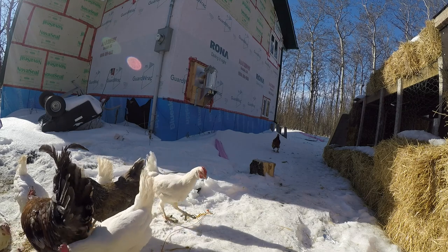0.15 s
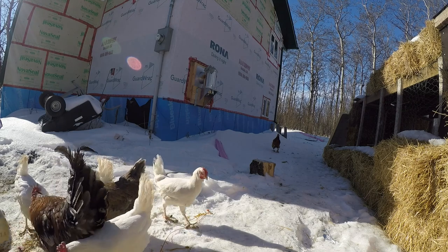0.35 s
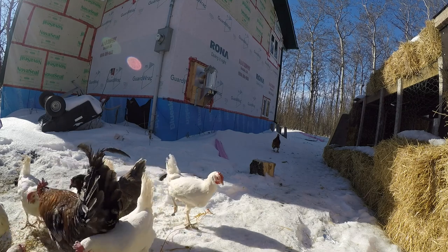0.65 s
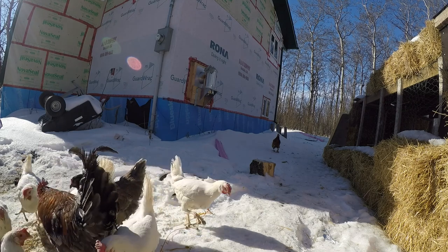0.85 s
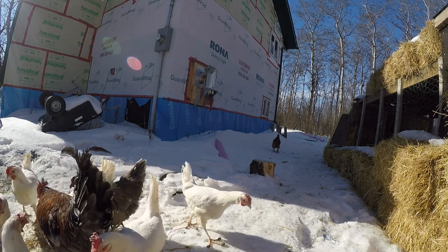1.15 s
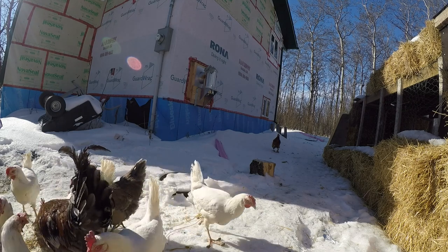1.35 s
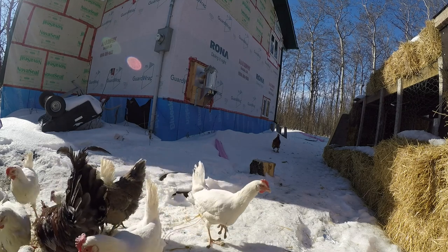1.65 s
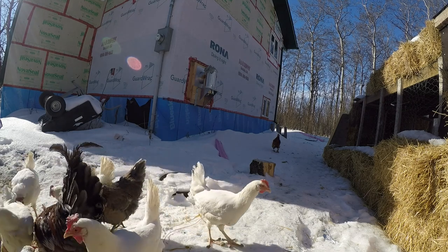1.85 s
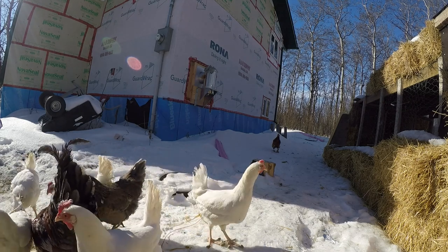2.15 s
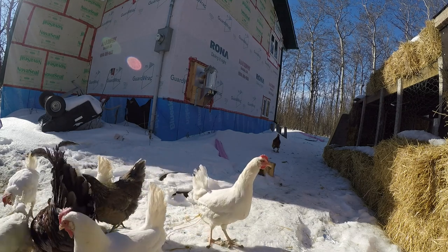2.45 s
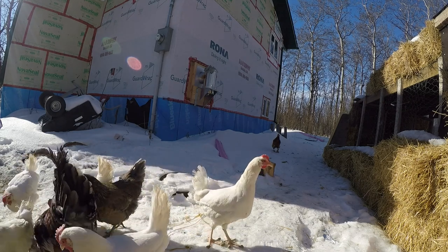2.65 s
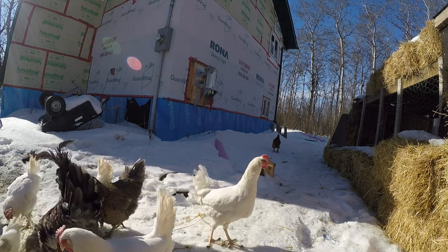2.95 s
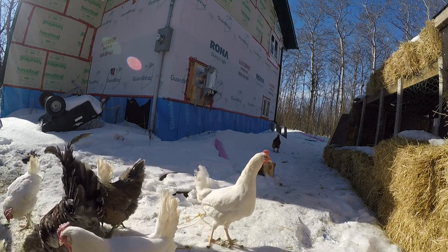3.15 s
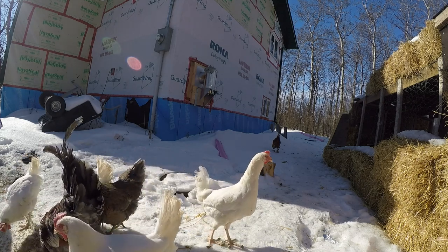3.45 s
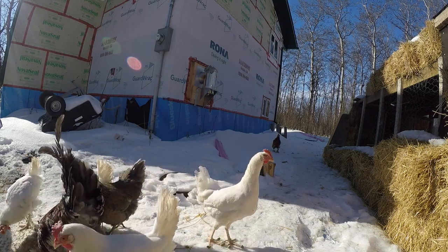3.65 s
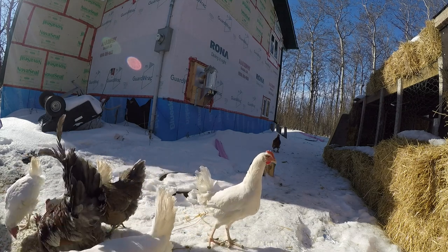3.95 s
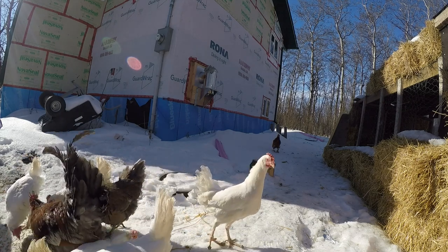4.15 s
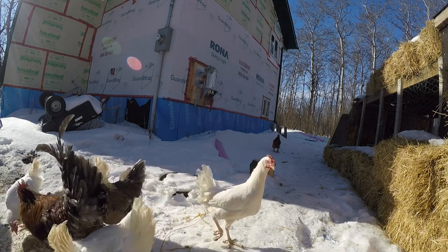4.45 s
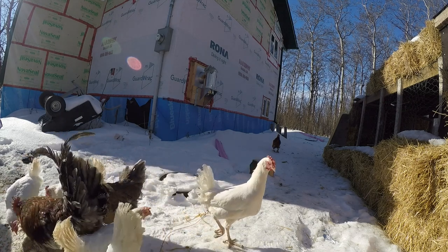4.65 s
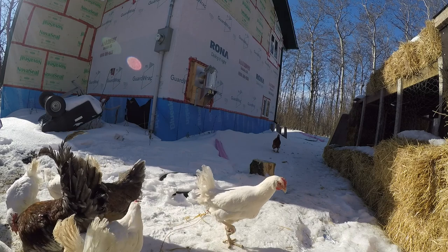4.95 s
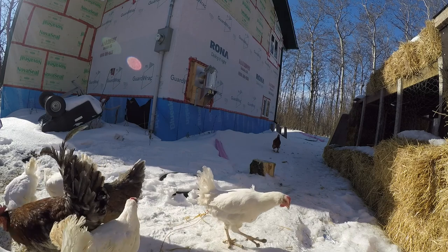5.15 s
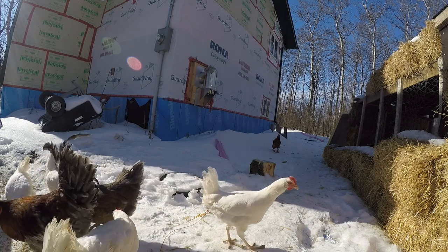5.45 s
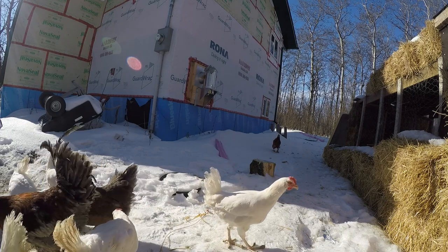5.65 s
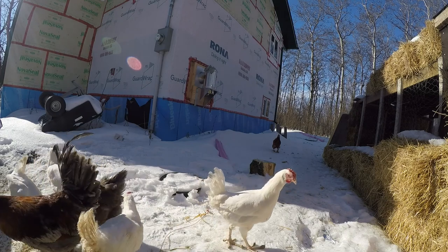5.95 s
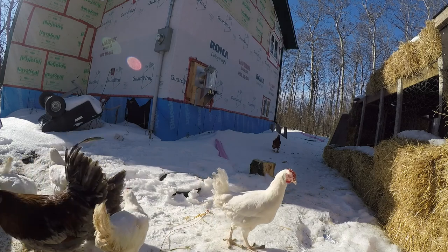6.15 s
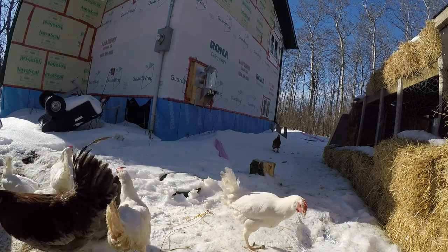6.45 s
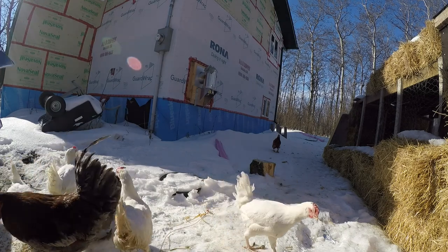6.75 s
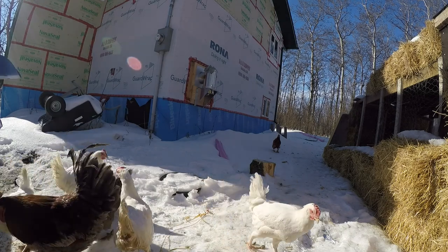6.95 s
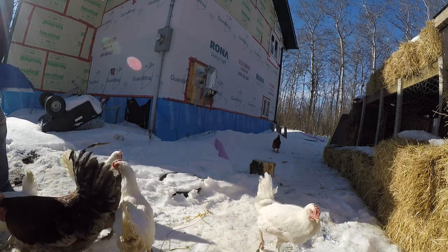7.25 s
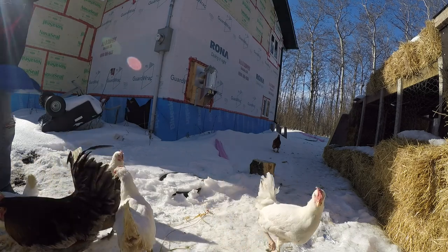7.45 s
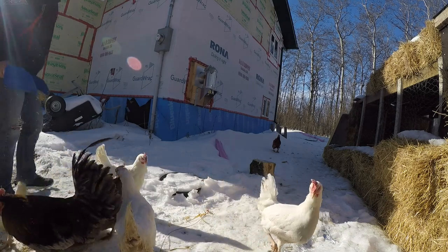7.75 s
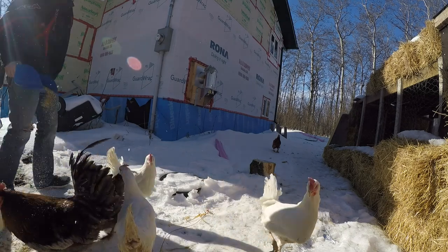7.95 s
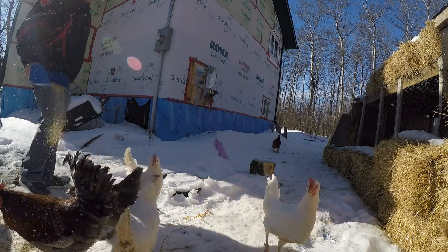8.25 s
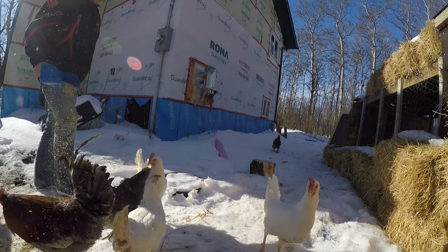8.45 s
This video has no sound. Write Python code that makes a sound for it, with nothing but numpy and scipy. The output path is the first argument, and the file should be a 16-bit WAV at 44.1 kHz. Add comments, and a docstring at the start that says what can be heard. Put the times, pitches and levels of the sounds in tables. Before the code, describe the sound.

Nearby chickens give short clucks and longer drawn-out calls while scratching softly in snow, as wind buffets the microphone.

```python
"""A snowy yard: hens cluck, peep, croon and scold close to a small camera in a housing.
Syrinx tones make the clear calls; membrane slaps ring windpipe and chest for the harsh ones.
Feet and beaks crunch the snow, ice crust snaps, wind buffets the microphone port.
A far engine hums and drops away near 5 s; the camera's electronics tick faintly, 30 times a second."""
import sys
import numpy as np
from scipy import signal
from scipy.fft import rfft, irfft, next_fast_len
from scipy.io import wavfile
from scipy.ndimage import map_coordinates

SR = 44100
rng = np.random.default_rng(int(sys.argv[2]) if len(sys.argv) > 2 else 0)


def inscribe(sig):
    """Save sig as 16-bit PCM at rate SR to the path in sys.argv[1].

    A 1-D sig is mono; a 2-D sig holds one channel per row.
    Samples are clipped to [-1, 1] before scaling.
    """
    pcm = np.round(np.clip(np.atleast_2d(sig).T, -1, 1) * 32767)
    wavfile.write(sys.argv[1], SR, pcm.astype(np.int16))


N = 379693

# distant air and traffic: f/Hz, relative density/dB
AIR_SPECTRUM = [(76, -26), (130, -7), (165, -10), (232, -11.5), (296, -12), (347, -12), (488, -18.5),
                (805, -10), (1620, -29.5), (3270, -26), (7740, -40), (8380, -33), (9080, -37), (14700, -41),
                (15600, -43.5)]
# engine hum: t/s, f/Hz, level/dB
ENGINE_TRACK = [(0, 116.8, -55), (2, 113.9, -54), (4.4, 114.5, -56), (4.9, 111.5, -58), (5.2, 109.3, -73),
                (8.61, 111.7, -65)]
# engine partials 1-3: gain/dB
ENGINE_PARTIALS_DB = [0.4, -13, -11]
# wind between gusts: t/s, level/dB
WIND_FLOOR = [(0, -46), (.9, -48), (3.3, -53), (5.1, -54), (6, -49), (6.8, -47.5), (7.15, -46), (7.8, -47),
              (8.1, -49), (8.61, -50)]
# gusts: t/s, level/dB, time to sink 10 dB/s
WIND_GUSTS = [(.55, -46, .2), (1.4, -46, .3), (4.1, -40.5, .12), (4.45, -40, .14), (5.6, -41.5, .3),
              (7.1, -43, .15), (7.45, -41, .1), (7.74, -40, .1), (7.94, -39.5, .08), (8.3, -43, .08)]
# buffeting at the port: f/Hz, relative density/dB
WIND_SPECTRUM = [(8.8, -29), (15, 0.5), (27, 0.5), (40, -0.5), (79, -11), (124, -25), (200, -31.5),
                 (260, -43), (440, -120)]
# drawn-out calls in the low register, one list each: t/s, f/Hz, level/dB
CROON_TRACKS = [
    [(0, 338.4, -43.5), (0.04, 313.6, -62.5), (0.085, 325, -43.5)],
    [(1.665, 570, -41), (1.7, 549, -44.5), (1.74, 553, -39), (1.8, 535, -40), (1.94, 563, -37.5),
     (2.025, 551, -42)],
    [(3.63, 380.4, -63.5), (3.75, 404.7, -60), (3.9, 439, -54.5), (3.92, 622, -58), (4.0, 616, -52)],
    [(4.045, 624, -45.5), (4.18, 612, -49), (4.21, 575, -50), (4.26, 635, -46), (4.36, 609.5, -48.5),
     (4.4, 651, -44.5), (4.5, 660, -43.5), (4.58, 703, -43), (4.68, 738, -43)],
    [(4.95, 281, -47.5), (4.99, 309.5, -49), (5.12, 302.6, -49), (5.16, 315, -49), (5.2, 298, -53),
     (5.31, 290, -55)],
    [(5.49, 1000, -54), (5.51, 1100, -49), (5.535, 1050, -55), (5.585, 1050, -57), (5.61, 1050, -58),
     (5.67, 1150, -50), (5.7, 1000, -56), (5.81, 1033, -52.5), (5.86, 1088, -47.5), (6.04, 1115, -46),
     (6.1, 1180, -43), (6.13, 1145, -43.5), (6.25, 1112, -45), (6.272, 1075, -47), (6.29, 1120, -44),
     (6.32, 1145, -48.5), (6.41, 1145, -47.5), (6.445, 1108, -47.5), (6.51, 1095, -45.5), (6.58, 1140, -45),
     (6.75, 1165, -45), (6.86, 1150, -48), (6.885, 1202, -62)],
    [(7.455, 439, -36.5), (7.48, 530, -40), (7.51, 513, -43.5), (7.58, 559, -37), (7.61, 593, -34),
     (7.735, 621, -34), (7.79, 600, -35), (7.815, 660, -34), (7.86, 640, -35), (7.91, 700, -33),
     (8.03, 721, -33), (8.14, 666, -31.5), (8.165, 542, -37)],
]
# per call: partial 2 trim/dB, partial 3 re 1/dB, step per further partial/dB, pitch flutter/fraction
CROON_TIMBRES = [(0, -6, -11, .015), (0.5, -37, -16, .014), (-4, -24, -6, 0.018), (1.5, -29, -1, .02),
                 (0.3, -1.5, -16, 0.014), (0.1, -48, -9, 0.0123), (0, -42, -13, 0.016)]
# croon partial 2: its own f/Hz, gain re partial 1/dB
SECOND_PARTIAL = [(560, -7), (620, 5), (780, 9), (900, 4.5), (1070, -4), (1230, -21.5), (1400, -22.5),
                  (1650, -33), (2250, -36), (2650, -32)]
# breaks into the high register: t/s, length/s, rise/Hz
REGISTER_BREAKS = [(1.82, .07, 60), (1.965, .05, 45), (5.54, .04, 200), (5.615, .035, 230),
                   (5.727, .04, 290), (5.83, .035, 60), (5.957, .065, 169.3), (6.085, .225, 85),
                   (6.408, .036, 105), (6.66, .025, 45), (6.7, .03, 55), (6.818, .09, 115),
                   (7.738, .07, 190), (7.82, .038, 125), (7.91, .095, 105.2), (8.038, .065, 136)]
# second membrane, beating under the scolding croon: t/s, f/Hz, side tone drive/dB
MEMBRANE_BEAT = [(5.7, 129.8, -66), (5.82, 135, -54), (5.87, 185, -41), (5.91, 140, -47),
                 (5.95, 155, -43.5), (6.04, 170, -38), (6.09, 140, -52), (6.3, 115, -46), (6.4, 135, -42),
                 (6.46, 159.8, -38), (6.52, 128, -44.5), (6.56, 135, -39.5), (6.61, 120, -45),
                 (6.8, 118, -42), (6.87, 117.4, -50)]
# crunches and pecks, drive per band: t/s, top/dB, middle/dB, dull/dB
SNOW_CRUNCHES = [(0.065, -58, -39.5, -36.5), (0.199, -47.5, -60, -55), (0.5122, -57.5, -46.5, -41),
                 (0.549, -63.5, -52, -64), (0.567, -44, -43, -43), (0.5791, -36, -46, -40),
                 (0.8177, -49, -46, -61), (2.5303, -39.5, -40.5, -28.5), (2.879, -43.5, -51, -51),
                 (2.9025, -39.5, -49, -47), (2.9497, -50.5, -66, -65), (4.7326, -53, -44.5, -60),
                 (5.003, -51, -64.5, -58), (5.3834, -52, -50, -57), (5.539, -49, -59, -61),
                 (5.794, -49, -60, -64), (5.817, -46, -54, -62), (5.85, -41, -52, -56),
                 (5.876, -47, -52, -60), (6.4508, -48.5, -47, -53), (6.6899, -65.5, -51.5, -41),
                 (6.8217, -75, -48.5, -45.5), (7.0317, -64, -46.5, -39.5), (7.071, -75, -52, -50),
                 (7.1052, -74, -46, -47), (7.211, -66.5, -54, -51), (7.2429, -67.5, -45.5, -45),
                 (8.0186, -54.5, -58, -36), (8.0748, -66.5, -47, -45), (8.107, -58, -51, -40)]
# shuffling feet, drive per band: t/s, crisp/dB, dull/dB
SNOW_SHUFFLE = [(0, -67.5, -64), (.4, -60.5, -61), (.62, -58, -68), (.86, -64.5, -68), (1.3, -65.5, -72),
                (1.55, -61, -67), (1.8, -68.5, -77), (3.5, -68.5, -76), (4.4, -65, -69.5),
                (5.1, -67, -69.5), (6.0, -64.5, -68), (6.5, -64, -65.5), (6.9, -68, -67.5),
                (7.2, -62.5, -56), (7.7, -62.5, -63.5), (8.1, -61.5, -64), (8.35, -62.5, -69.5),
                (8.61, -62.5, -73)]
# scrapes of feet and feathers, drive per band: t/s, length/s, crisp/dB, dull/dB
SNOW_SCUFFS = [(0.193, 0.026, -58, -65), (0.496, 0.046, -55, -54), (0.547, 0.049, -57, -56),
               (0.749, 0.098, -59.5, -73.5), (2.897, 0.043, -59, -70), (4.916, 0.056, -58.5, -75),
               (5.8, 0.115, -56.5, -76), (5.915, 0.075, -58.5, -68), (7.202, 0.057, -67, -52.5),
               (7.91, 0.05, -62, -50), (7.97, 0.16, -69.5, -55.5), (8.137, 0.13, -68, -64),
               (8.518, 0.081, -74, -54.5)]
# crisp snow (top and middle bands): f/Hz, relative density/dB
CRISP_SPECTRUM = [(1470, -16.5), (2500, 2), (3140, -3.5), (3500, 0), (4140, -5), (4750, 5), (5400, 3.5),
                  (6100, -4.5), (7200, -1.5), (8480, -11), (15500, -21)]
# dull snow: f/Hz, relative density/dB
DULL_SPECTRUM = [(110, -40), (190, -14), (500, -3.5), (900, -0.5), (1500, -7.5), (2500, -13), (4000, -30),
                 (6000, -58)]
# clucks: t/s, length/s, start f/Hz, end f/Hz, fundamental/dB, mouth f/Hz, overtones there/dB, roughness
CLUCK_NOTES = [(0.155, 0.052, 333, 288, -42.5, 600, -43, 0.12),
               (1.335, 0.026, 325, 296, -45, 850, -31, 0.04), (1.448, 0.053, 437, 327, -50, 750, -36, 0.56),
               (1.618, 0.035, 337.5, 352, -46.5, 690, -31.5, 0.09),
               (1.99, 0.031, 309, 303, -43, 930, -40, 0.11),
               (2.08, 0.048, 664, 593, -31.5, 1400, -51, 0.12),
               (2.313, 0.035, 580, 525, -34, 1100, -37, 0.15),
               (2.547, 0.036, 581, 557, -35, 1130, -44, 0.09),
               (2.735, 0.043, 586, 539, -34.5, 1120, -39, 0.08),
               (4.011, 0.037, 475, 451, -52.5, 900, -47, 0.15),
               (4.221, 0.036, 378, 326, -54.5, 690, -40, 0.28),
               (4.78, 0.032, 284, 301, -46, 890, -37.5, 0.05),
               (4.846, 0.02, 325, 295, -50, 880, -36.5, 0.07),
               (4.901, 0.037, 326, 294, -52, 730, -45, 0.08),
               (5.35, 0.046, 314, 323, -46, 630, -41.5, 0.26),
               (6.125, 0.034, 623, 594, -41, 1200, -48, 0.07), (6.165, 0.1, 603, 610, -43, 1200, -52, 0.1),
               (6.125, 0.03, 830, 840, -50, 1700, -70, 0.2), (6.215, 0.045, 850, 830, -51, 1700, -70, 0.2),
               (6.83, 0.044, 645, 631, -36.5, 1270, -44, 0.16),
               (7.294, 0.04, 338, 292, -46, 780, -30, 0.04), (7.429, 0.03, 321, 361, -46, 770, -32, 0.19)]
# ice crust snaps: t/s, relative level/dB, f/Hz
ICE_SNAPS = [(0.2854, -52, 5360), (0.3304, -51, 5330), (0.4673, -43, 5280), (0.4904, -41, 5480),
             (0.6818, -47, 5060), (0.9552, -48, 5200), (1.1917, -44, 5610), (1.4955, -47, 5250),
             (1.5673, -49, 4790), (2.3526, -47, 6730), (2.3624, -50, 8070), (3.2675, -42, 13900),
             (3.2764, -48, 8020), (3.5024, -48, 6990), (4.2348, -54, 7810), (4.5994, -48, 5110),
             (4.6623, -51, 5500), (5.0923, -49, 4630), (5.9409, -43, 4750), (6.4263, -44, 5400),
             (7.1831, -49, 5010), (7.7628, -48, 5150), (7.9224, -46, 5270), (8.1644, -49, 4890),
             (8.4123, -45, 5470)]
# squawks and throat pops: t/s, length/s, windpipe drive/dB, chest drive/dB
SQUAWK_BURSTS = [(0.502, 0.039, -47, -47.5), (0.734, 0.01, -40.5, -49.5), (1.87, 0.03, -36, -45.5),
                 (2.122, 0.043, -33, -42.5), (2.251, 0.049, -34, -41), (2.306, 0.012, -46, -60),
                 (2.373, 0.035, -29.5, -38), (2.41, 0.01, -39.5, -61), (2.49, 0.0076, -41, -47),
                 (2.503, 0.068, -35, -46.5), (2.729, 0.008, -33, -42.5), (2.831, 0.0061, -43, -52),
                 (3.944, 0.032, -44, -48), (4.635, 0.016, -46.5, -50), (5.247, .004, -36, -50),
                 (5.288, .004, -34, -48), (5.299, .004, -34, -48), (5.343, .008, -34, -48),
                 (5.389, .006, -36, -50), (5.431, .006, -36, -48), (5.442, .004, -36, -46),
                 (5.449, .006, -37, -46), (5.529, 0.027, -35, -40.5), (5.637, 0.027, -28.5, -50),
                 (5.976, 0.014, -38, -50.5), (6.973, 0.017, -23, -40), (6.992, 0.03, -24, -41),
                 (7.021, 0.03, -45, -58), (7.199, 0.049, -41, -49), (7.401, 0.016, -39, -53),
                 (8.255, 0.014, -39.5, -52), (8.52, 0.028, -44, -56), (8.553, 0.022, -41.5, -49)]
# growl: t/s, windpipe drive/dB, slap rate/Hz
GROWL_TRACK = [(5.13, -62, 250), (5.18, -50, 240), (5.24, -41, 205), (5.262, -41, 200), (5.275, -48, 180),
               (5.31, -45, 165), (5.37, -44, 185), (5.4, -43, 195), (5.418, -52, 190), (5.435, -44, 175),
               (5.48, -42, 175), (5.495, -52, 185), (5.6, -50, 250), (5.68, -44, 186)]
# upper windpipe resonances: f/Hz, width/Hz, gain/dB
PIPE_MODES = [(1820, 260, -33), (2750, 260, -37), (3600, 300, -43), (5000, 500, -48)]
# sucks of wind at the port: t/s, relative depth/dB, half width/s
PRESSURE_DROPS = [(.512, -35, .013), (1.527, -34, .01), (2.418, -33, .012), (4.097, -33, .018),
                  (4.227, -34, .016), (4.402, -31, .013), (5.279, -26, .013), (5.448, -32, .016),
                  (5.594, -30, .018), (6.817, -33, .016), (7.317, -22, .011), (7.527, -22, .011),
                  (7.717, -32, .015), (7.865, -32, .009), (7.953, -27, .015), (8.227, -23, .012)]
# peeps: t/s, length/s, peak position/0-1, start f/Hz, end f/Hz, level/dB
PEEP_NOTES = [(0.755, 0.038, 0.44, 890, 857, -38), (2.595, 0.051, 0.8, 802, 800, -51),
              (2.64, 0.067, 0.7, 792, 948, -34), (2.85, 0.056, 0.24, 824, 990, -29.5),
              (3.005, 0.06, 0.58, 822, 1040, -33.5), (5.172, 0.026, 0.5, 845, 870, -36),
              (5.267, 0.021, 0.6, 870, 830, -31), (5.31, 0.045, 0.2, 830, 720, -38),
              (5.404, 0.027, 0.3, 800, 740, -37.5), (5.433, 0.055, 0.6, 790, 700, -41),
              (5.497, 0.02, 0.5, 1590, 1610, -56), (5.51, 0.031, 0.69, 821, 836, -35),
              (5.55, 0.028, 0.2, 772, 894, -35), (5.597, 0.047, 0.68, 857, 789, -28),
              (5.685, 0.046, 0.65, 850, 814, -23.5), (5.765, 0.033, 0.23, 862, 880.0, -35.5),
              (5.795, 0.028, 0.49, 930, 840, -28.5), (6.836, 0.033, 0.55, 850, 825, -31),
              (7.086, 0.044, 0.87, 892, 783, -23.0), (7.135, 0.034, 0.3, 807, 808, -44)]


def amp(db):
    return 10 ** (np.asarray(db) / 20)


def unit_rms(x):
    return x / np.sqrt(np.mean(x ** 2) + 1e-20)


def db_at(spectrum, hz):
    """Interpolate on a log frequency axis."""
    knots_hz, db = np.transpose(spectrum)
    return np.interp(np.log(hz + 1), np.log(knots_hz + 1), db)


def curves(rows):
    """First sample index, and each column per sample over the table's span."""
    t_s, *columns = np.transpose(rows)
    n = np.arange(round(t_s[0] * SR), min(N, round(t_s[-1] * SR)))
    return n[0], [np.interp(n / SR, t_s, column) for column in columns]


def wobble(rate_hz, size=N):
    """Smooth random curve, rms near 1."""
    knots = rng.standard_normal(int(size * rate_hz / SR) + 4)
    return map_coordinates(knots, [np.arange(size) * rate_hz / SR])


def filtered(x, response):
    size = next_fast_len(N + 8192)
    return irfft(rfft(x, size) * response(np.fft.rfftfreq(size, 1 / SR)), size)[:N]


def coloured(x, spectrum):
    return unit_rms(filtered(x, lambda hz: amp(db_at(spectrum, hz))))


def resonance(hz, centre_hz, width_hz):
    """Squared band-pass response, 1 at centre."""
    return (1j * hz * width_hz / (centre_hz ** 2 - hz ** 2 + 1j * hz * width_hz)) ** 2


def add(track, start, x):
    track[start:start + len(x)] += x[:N - start]


def puff(length_s, peak, power):
    """Progress 0-1, and an envelope that swells until progress = peak, then shuts."""
    u = np.linspace(0, 1, round(length_s * SR))
    return u, np.sin(np.pi / 2 * np.interp(u, [0, peak, 1], [0, 1, 0])) ** power


def air():
    """Distant air and traffic, slowly wavering."""
    return amp(-58 + .7 * wobble(2)) * coloured(rng.standard_normal(N), AIR_SPECTRUM)


def engine():
    """Far, slightly unsteady hum of three harmonics."""
    _, (hz, db) = curves(ENGINE_TRACK)
    phase = 2 * np.pi * np.cumsum(hz + .8 * wobble(9)) / SR
    return sum(amp(db + gain_db + 1.6 * wobble(14)) * np.sin(k * phase)
               for k, gain_db in enumerate(ENGINE_PARTIALS_DB, 1))


def wind(rise_ratio=1.3):
    """Lumps of pressure on the microphone port; gusts rise faster than they sink."""
    t = np.arange(0, N, 100) / SR
    gusts = sum(amp(db - 10 * np.maximum(rise_ratio * (t_s - t), t - t_s) / sink_s)
                for t_s, db, sink_s in WIND_GUSTS)
    lumps = amp(.77 * wobble(4.3) + 3.1 * wobble(17))
    _, (floor_db,) = curves(WIND_FLOOR)
    level = amp(floor_db) + np.interp(np.arange(N) / SR, t, gusts)
    return level * coloured(lumps * rng.standard_normal(N), WIND_SPECTRUM)


def syrinx(hz, partials_db, rough, flutter):
    """Harmonic tone and its phase; roughness shakes each partial separately."""
    size = len(hz)
    phase = 2 * np.pi * np.cumsum(hz * (1 + flutter * wobble(55, size))) / SR
    tone = np.zeros(size)
    for k, db in enumerate(partials_db):
        shake_db = 5.7 * rough * wobble(170, size)
        flicker_db = 1.1 * min(k, 3) * wobble(25, size)
        shake_rad = 3 * (1 + .5 * k) * rough * wobble(170, size)
        tone += amp(db + shake_db + flicker_db) * np.sin((k + 1) * phase + shake_rad)
    return np.sqrt(2) * tone * amp(1.18 * wobble(44.05, size)), phase


def stepped_hz(call, t, steepness=1.74):
    """Pitch lingers at each value and moves quickly between."""
    t_s, hz, _ = np.transpose(call)
    rows = np.arange(len(call))
    row, u = np.divmod(np.interp(t, t_s, rows), 1)
    eased = u ** steepness / (u ** steepness + (1 - u) ** steepness)
    return np.interp(row + eased, rows, hz)


def register(t, crossover_s=.017):
    """Share of the high register (0-1) and its pitch rise in Hz."""
    t_s, length_s, rise_hz = np.transpose(REGISTER_BREAKS)[..., None]
    ramp = np.clip(np.minimum(t - t_s, t_s + length_s - t) / crossover_s, 0, 1)
    high = np.sin(np.pi / 2 * ramp) ** 2
    return high.max(axis=0), (high * rise_hz).sum(axis=0)


def croons(scold_index=5, break_db_per_hz=.015, brighten_db=18, mute_db=-18):
    """Long syrinx notes that slide and break upward; the scold is hoarse when low, bright when high."""
    out = np.zeros(N)
    for k, (call, timbre) in enumerate(zip(CROON_TRACKS, CROON_TIMBRES)):
        trim_db, third_db, step_db, flutter = timbre
        start, (_, db) = curves(call)
        t = (start + np.arange(len(db))) / SR
        high, rise_hz = register(t)
        hz = stepped_hz(call, t) + rise_hz
        db = db + break_db_per_hz * rise_hz
        overtone_db = db + brighten_db * high * (k == scold_index)
        second_db = overtone_db + trim_db + db_at(SECOND_PARTIAL, 2 * hz)
        upper_db = [overtone_db + third_db + n * step_db for n in range(3)]
        tone, phase = syrinx(hz, [db, second_db, *upper_db], rough=.09, flutter=flutter)
        if k == scold_index:
            tone += amp(mute_db * high) * side_tones(t, hz, phase)
        add(out, start, signal.windows.tukey(len(t), 900 / len(t)) * tone)
    return out


def walls(x, t60_s=.18, delay_s=.006):
    """Short reverberation from the house wall and bales."""
    t = np.arange(SR // 5) / SR
    tail = rng.standard_normal(len(t)) * amp(-60 * t / t60_s) * (t > delay_s)
    return signal.fftconvolve(x, tail / np.linalg.norm(tail))[:N]


def snow(split_hz=5500):
    """Crunches die fast, heavier ones more slowly; clumps of grains follow the shuffling feet."""
    top, middle, dull = np.zeros((3, N))
    t = np.arange(SR // 8) / SR
    for t_s, *bands_db in SNOW_CRUNCHES:
        t60_s = max(.02 + .001 * (max(bands_db) + 45), .005)
        attack = 1 - np.exp(-t / .00071)
        envelope = attack * amp(-60 * t / t60_s + 3 * wobble(830, len(t)))
        for track, db in zip((top, middle, dull), bands_db):
            add(track, round(t_s * SR), amp(db) * envelope)
    crisp_shuffle, dull_shuffle = amp(curves(SNOW_SHUFFLE)[1])
    for t_s, length_s, crisp_db, dull_db in SNOW_SCUFFS:
        _, swell = puff(length_s, peak=.4, power=.55)
        add(crisp_shuffle, round(t_s * SR), amp(crisp_db) * swell)
        add(dull_shuffle, round(t_s * SR), amp(dull_db) * swell)
    clumps_db = wobble(20)

    def band(crunches, shuffle, spectrum, weight):
        grains_db = clumps_db + 1.3 * wobble(40) + 2.94 * wobble(200) + 3.46 * wobble(900)
        noise = (crunches + shuffle * unit_rms(amp(grains_db))) * rng.standard_normal(N)
        return filtered(noise, lambda hz: unit_rms(amp(db_at(spectrum, hz)) * weight(hz)))

    highpass = lambda hz: 1 / (1 + (split_hz / (hz + 1)) ** 6)
    return (band(top, amp(-5.5) * crisp_shuffle, CRISP_SPECTRUM, highpass)
            + band(middle, amp(-6.5) * crisp_shuffle, CRISP_SPECTRUM, lambda hz: 1 - highpass(hz))
            + band(dull, amp(5) * dull_shuffle, DULL_SPECTRUM, lambda hz: 1))


def camera_whine(whine_hz=8602, frame_hz=29.97, first_s=.0295, width_frames=.11):
    """Thin electronic whine that leaks through once a frame."""
    t = np.arange(N) / SR
    offset_frames = ((t - first_s) * frame_hz + .5) % 1 - .5
    gate = np.exp(-(offset_frames / width_frames) ** 2)
    return amp(-71.5) * gate * np.sin(2 * np.pi * whine_hz * t)


def mouth_db(harmonic, pitch_hz, mouth_hz):
    """Gain re the mouth resonance; a second resonance lies at 2.5 times its frequency."""
    octaves = np.log2(harmonic * pitch_hz / mouth_hz)
    if octaves <= 0:
        return 13 * octaves
    rolloff_db = max(-27 * octaves, -24 - 10 * octaves)  # shallow branch: thin treble edge
    purity = (pitch_hz / 320) ** .8  # higher clucks are purer
    beak_db = 6 * np.exp(-((octaves - np.log2(2.5)) / .1) ** 2 / 2)
    return rolloff_db * purity + beak_db


def clucks():
    """Short, evenly sliding syrinx notes shaped by the mouth."""
    out = np.zeros(N)
    for t_s, length_s, start_hz, end_hz, first_db, mouth_hz, overtone_db, rough in CLUCK_NOTES:
        u, swell = puff(length_s, peak=.35, power=.53)
        hz = start_hz + (end_hz - start_hz) * u
        upper_db = [overtone_db + mouth_db(k, hz.mean(), mouth_hz) for k in range(2, 14)]
        tone, _ = syrinx(hz, [first_db, *upper_db], rough, flutter=.0071)
        add(out, round(t_s * SR), swell * tone)
    return out


def ice_snaps(t60_s=.006):
    """The crust snaps in tiny bursts of octave-wide noise."""
    out, t = np.zeros(N), np.arange(SR // 50) / SR
    for t_s, db, hz in ICE_SNAPS:
        bandpass = signal.butter(1, [hz / np.sqrt(2), hz * np.sqrt(2)], "band", fs=SR)
        noise = unit_rms(signal.lfilter(*bandpass, rng.standard_normal(len(t))))
        add(out, round(t_s * SR), amp(db - 5 - 60 * t / t60_s) * noise)
    return out


def slaps(rate_hz, jitter):
    """One impulse per membrane slap, uneven in time and strength."""
    size = len(rate_hz)
    cycles = .899 + np.cumsum(rate_hz * np.clip(1 + jitter * wobble(260, size), .3, 2)) / SR
    impulses = np.diff(np.floor(cycles), prepend=0)
    return impulses * np.sqrt(SR / rate_hz) * amp(3.4 * wobble(300, size))


def squawks(slap_hz=270):
    """Squawks and a growl: softened slaps ring windpipe and chest, sharp ones pipe modes and mouth."""
    pipe, chest, growl = np.zeros((3, N))
    for t_s, length_s, pipe_db, chest_db in SQUAWK_BURSTS:
        _, swell = puff(length_s, peak=.08, power=.66)
        train = swell * slaps(np.full(len(swell), slap_hz), jitter=.15)
        add(pipe, round(t_s * SR), amp(pipe_db) * train)
        add(chest, round(t_s * SR), amp(chest_db) * train)
    start, (growl_db, rate_hz) = curves(GROWL_TRACK)
    add(growl, start, amp(growl_db) * slaps(rate_hz, jitter=.13))
    window = np.hanning(46)
    soften = lambda x: np.convolve(x, window / window.sum())[:N]

    def ring(x, centre_hz, width_hz):
        gain = np.sqrt(2 * SR / (np.pi * width_hz))
        return gain * filtered(x, lambda hz: resonance(hz, centre_hz, width_hz))

    return (ring(soften(pipe + growl), centre_hz=850, width_hz=420)
            + ring(soften(chest + amp(-9) * growl), centre_hz=400, width_hz=320)
            + sum(amp(db) * ring(pipe, hz, width_hz) for hz, width_hz, db in PIPE_MODES)
            + amp(-27) * ring(growl, centre_hz=1450, width_hz=320))  # mouth


def wind_thumps(vent_hz=13, width_hz=20):
    """Brief pressure drops at the port; the vented housing rebounds."""
    out, t = np.zeros(N), np.arange(-2000, 2000) / SR
    for t_s, db, half_width_s in PRESSURE_DROPS:
        drop = -amp(db + 2.5) * np.exp(-np.log(16) * (t / half_width_s) ** 2)
        add(out, round(t_s * SR) - len(t) // 2, drop)
    return filtered(out, lambda hz: -hz ** 2 / (vent_hz ** 2 - hz ** 2 + 1j * hz * width_hz))


def peeps():
    """Near-pure whistles: rising ones bend late, falling ones early."""
    out = np.zeros(N)
    for t_s, length_s, peak, start_hz, end_hz, db in PEEP_NOTES:
        u, swell = puff(length_s, peak, power=.84)
        bend = u ** 4.1 if end_hz > start_hz else 1 - (1 - u) ** 1.55
        hz = start_hz + (end_hz - start_hz) * bend
        tone, _ = syrinx(hz, [db, db - 44.5], rough=.02, flutter=.0089)
        add(out, round(t_s * SR), swell * tone)
    return out


def side_tones(t, hz, phase, pipe_hz=915, width_hz=190):
    """A slow membrane splits off hoarse tones below the note; the open windpipe filters them."""
    t_s, knots_hz, db = np.transpose(MEMBRANE_BEAT)
    beat_hz = np.interp(t, t_s, knots_hz) * (1 + .13 * wobble(110, len(t)))
    beat_phase = 2 * np.pi * np.cumsum(beat_hz) / SR
    out = np.zeros(len(t))
    for k in range(1, 5):
        pipe_gain = np.abs(resonance(hz - k * beat_hz, pipe_hz, width_hz))
        out += pipe_gain * amp(3 * wobble(90, len(t))) * np.sin(phase - k * beat_phase)
    return np.sqrt(2) * amp(np.interp(t, t_s, db)) * out


def scene():
    hens = clucks() + peeps() + croons() + squawks()
    reverb = amp(-16.5) * walls(hens)
    ground = snow() + ice_snaps()
    return (hens + reverb + ground + wind() + wind_thumps() + air() + engine() + camera_whine())[None]


def record(dry):
    """The camera's band limit."""
    return filtered(dry[0], lambda hz: hz < 15550)[None]


dry = scene()
out = record(dry)
inscribe(out)
```